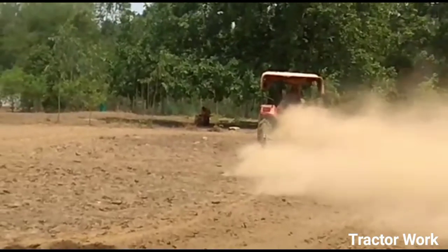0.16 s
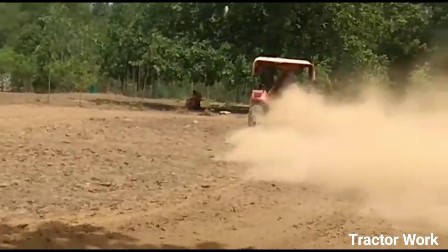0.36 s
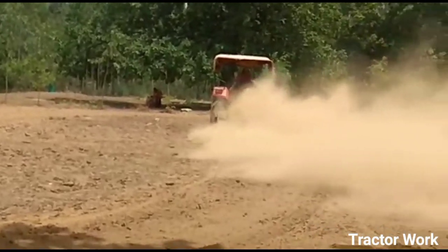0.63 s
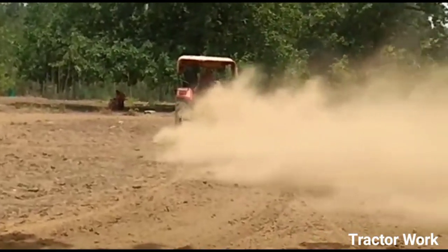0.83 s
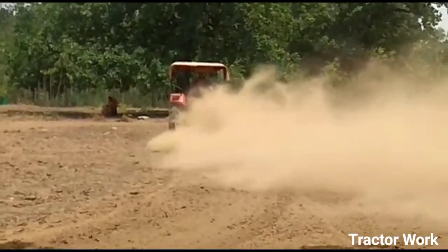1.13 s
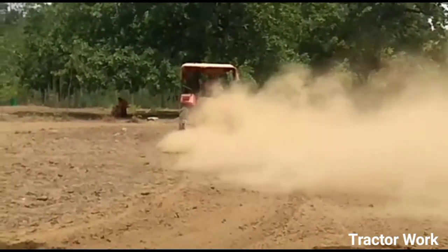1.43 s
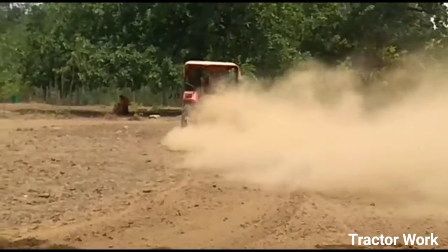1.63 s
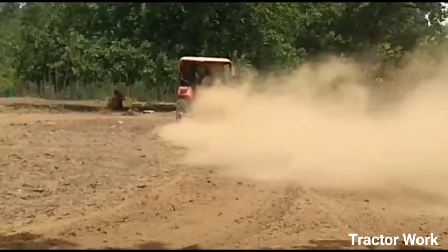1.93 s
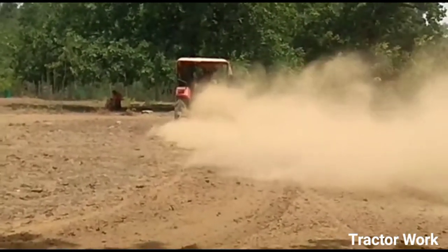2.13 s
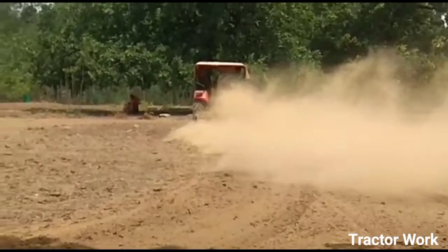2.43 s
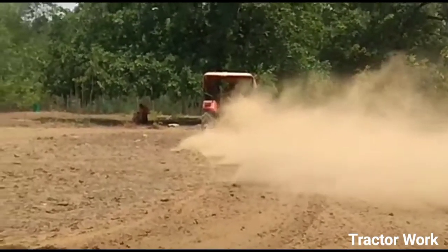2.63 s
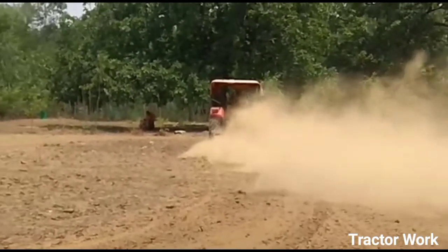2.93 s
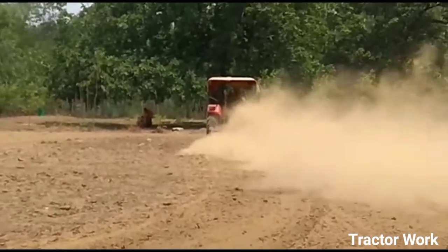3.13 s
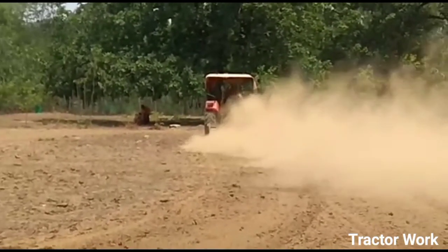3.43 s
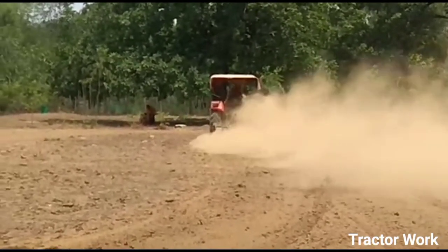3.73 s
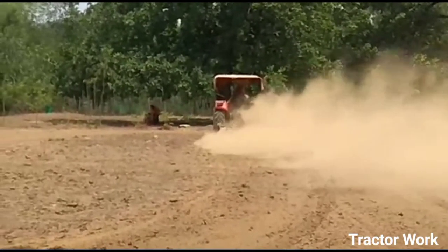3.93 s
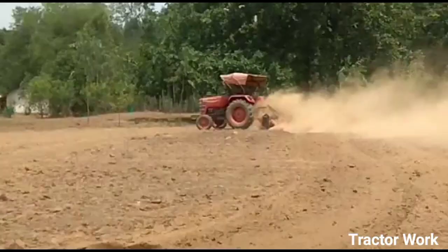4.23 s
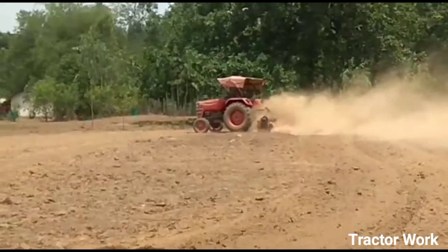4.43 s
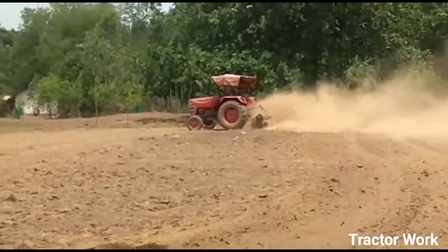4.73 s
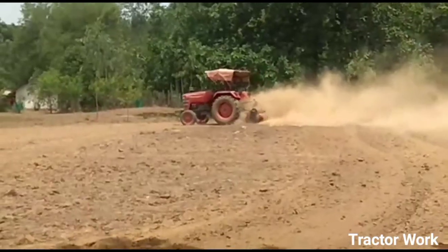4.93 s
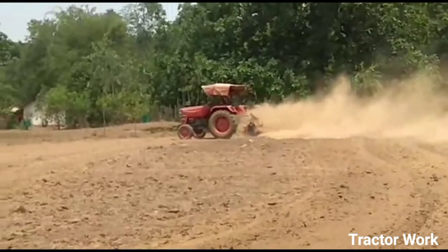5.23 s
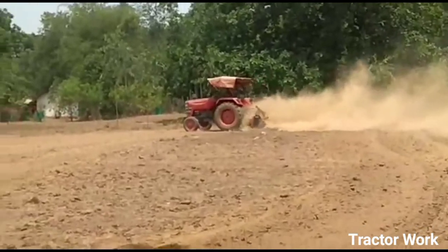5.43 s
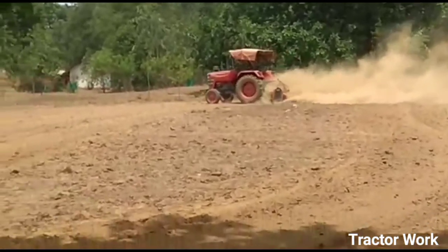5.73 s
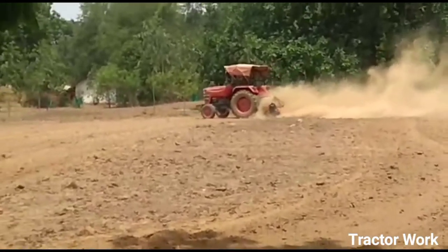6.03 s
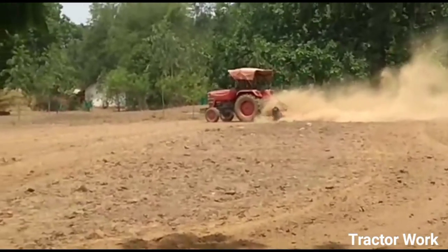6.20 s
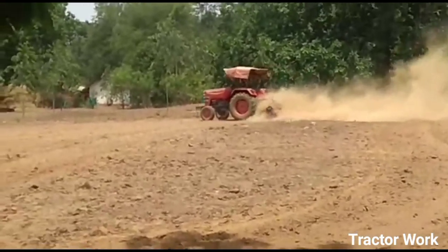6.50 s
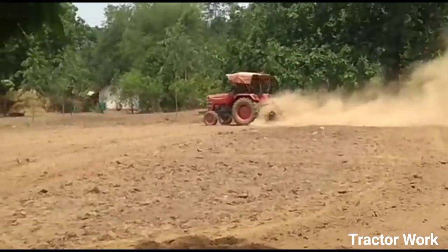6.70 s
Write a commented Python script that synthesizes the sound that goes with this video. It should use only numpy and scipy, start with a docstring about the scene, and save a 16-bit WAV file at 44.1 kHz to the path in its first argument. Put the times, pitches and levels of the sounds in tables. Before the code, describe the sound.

A diesel tractor throbs and rasps while its tiller churns dry soil, with hissing grit and stones clanking on steel, then sounds farther off.

```python
"""A three-cylinder diesel tractor drags a rotary tiller through dry soil, heard from behind, then
farther off from the side. Each firing pulses the exhaust, which throbs and rasps, and shakes the
panels and engine block. Soil drag sets the clatter; the tines scrape, crunch clods and throw up
hissing showers and crumbs. Stones ring the steel hood, pebbles clink, and a few dull thumps and
knocks fall in between, over faint open-field air."""
import sys
import numpy as np
from scipy import signal
from scipy.fft import rfft, irfft, next_fast_len
from scipy.io import wavfile

SR = 44100
rng = np.random.default_rng(int(sys.argv[2]) if len(sys.argv) > 2 else 0)


def write(x):
    x = np.atleast_2d(x).T
    wavfile.write(sys.argv[1], SR, np.round(np.clip(x, -1, 1) * 32767).astype(np.int16))


N = 302526
TIME_S = np.arange(N) / SR
FFT_SIZE = next_fast_len(N + 8192)
FREQ_HZ = np.maximum(np.arange(FFT_SIZE // 2 + 1) * SR / FFT_SIZE, 1)
TURN_S = 4.15
SIDE_VIEW = np.clip((TIME_S - TURN_S) / 0.043 + .5, 0, 1)   # 0 from behind, 1 from the side


def from_db(db):
    """Decibels to gain."""
    return np.exp(np.asarray(db) * (np.log(10) / 20))


def unit(x):
    """Stereo pair scaled to centre rms 1."""
    return x / np.sqrt(np.mean(x.mean(axis=0) ** 2) + 1e-20)


def curve(rows):
    """(t/s, value) rows at every sample."""
    return np.interp(TIME_S, *np.transpose(rows))


def pan(db):
    """L-R level to two gains of mean 1."""
    gains = from_db(np.array([[.5], [-.5]]) * db)
    return gains / gains.mean(axis=0)


def drift(rate_hz):
    """Random wander, spread about 1."""
    knots = rng.standard_normal(2048)
    return np.interp(TIME_S * rate_hz, np.arange(len(knots)), knots)


def stereo_noise(coherence):
    """White noise, partly common to both sides."""
    common = np.sqrt(coherence) * rng.standard_normal(N)
    return common + np.sqrt(1 - coherence) * rng.standard_normal((2, N))


def colour(x, spectrum):
    """Filter by (f/Hz, level/dB) rows; white noise keeps its power."""
    hz, db = np.transpose(spectrum)
    gain = from_db(np.interp(np.log(FREQ_HZ), np.log(hz), db))
    return irfft(rfft(x, FFT_SIZE) * gain / np.sqrt(np.mean(gain ** 2)), FFT_SIZE)[:, :N]


def bandpass(x, low_hz, high_hz, order=3):
    """Flat-topped band filter."""
    return signal.sosfilt(signal.butter(order, [low_hz, high_hz], "band", fs=SR, output="sos"), x)


def radiate(x, modes, view, flicker_db):
    """Steep, separately flickering resonances, rms 1; view 0..1 blends their two level columns."""
    spectrum = rfft(x.astype(np.float32), FFT_SIZE)
    out = power = 0
    for hz, width_hz, rear_db, side_db, pan_db in modes:
        skirt = 1 + ((FREQ_HZ / hz - hz / FREQ_HZ) * hz / width_hz) ** 2 / 2
        band = irfft(spectrum / (skirt ** 1.5).astype(np.float32), FFT_SIZE)[:, :N]
        gain = from_db(rear_db) * (1 - view) + from_db(side_db) * view
        out = out + band * gain * from_db(flicker_db * drift(28)) * pan(pan_db)
        power = power + width_hz * gain ** 2
    return unit(out / np.sqrt(power))


def puffs(firing, depth, decay, delay):
    """Envelope with one burst a firing; decay and delay in firing periods."""
    return np.sqrt(1 + depth * np.exp(-((firing - delay) % 1) / decay))


def dying(clicks, t60_s):
    """Exponential tail on each click."""
    return signal.lfilter([1], [1, -from_db(-60 / (t60_s * SR))], clicks + 1e-18)


def grains(per_s, spread_db, t60_s, clump_db):
    """Envelope of many small, uneven impacts in clumps."""
    sizes = from_db(spread_db * np.minimum(rng.exponential(1, N), 3))
    born = rng.random(N) < per_s / SR
    power = dying(born * sizes ** 2, t60_s / 2)
    return np.sqrt(.35 + power) * from_db(clump_db * drift(35))


def burst(at_s, t60_s):
    """Envelope of one blow."""
    start, out = int(at_s * SR), np.zeros(N)
    age_s = TIME_S[:min(N - start, int(2 * t60_s * SR))]
    out[start:start + len(age_s)] = from_db(-60 * age_s / t60_s)
    return out


def strike(at_s, modes, rise_s):
    """One blow rings (f/Hz, level/dB, t60/s) modes."""
    start, out = int(at_s * SR), np.zeros(N)
    age_s = TIME_S[:min(N - start, SR // 4)]
    ring = sum(from_db(db - 60 * age_s / t60_s) * np.sin(2 * np.pi * hz * age_s)
               for hz, db, t60_s in modes)
    out[start:start + len(age_s)] = ring * (1 - np.exp(-age_s / rise_s))
    return out


# engine speed: t/s, firing rate/Hz
FIRING_RATE = [(0.0, 43.85), (0.9, 43.65), (1.5, 43.85), (2.0, 44.15), (2.5, 44.2), (2.8, 44.5),
               (3.1, 44.3), (3.6, 44.6), (4.17, 43.95), (4.6, 44.15), (6.0, 44.15), (6.86, 43.9)]
def firing_phase():
    """Running count of cylinder firings."""
    return np.cumsum(curve(FIRING_RATE)) / SR - .5


# exhaust harmonics: order of the four-stroke cycle, full level/dB, dull level/dB
NOTE_ORDERS = [(5, -27, -7), (6, -10.5, -4.5), (8, -14.5, -17), (9, 3.5, 7), (10, -18, -52),
               (11, -13.5, 2.5), (12, -12.5, 3.5), (13, -10.5, -25), (15, -2.5, -15), (18, -11.5, -35),
               (21, -33, -29), (27, -36, -23.5)]
# exhaust note: t/s, level/dB
NOTE_LEVEL = [(0.0, -36.5), (0.85, -38), (1.05, -37.5), (1.5, -40.5), (1.76, -36), (2.4, -42.5),
              (2.64, -36), (2.9, -43), (3.18, -37), (3.35, -42.5), (3.97, -44), (4.06, -41.5), (4.13, -39),
              (4.18, -57.5), (4.42, -45.5), (4.74, -53.5), (5.2, -48.5), (6.08, -46.5), (6.32, -48.5),
              (6.59, -46.5), (6.86, -46)]
def exhaust_note(firing, dull):
    """Every third order is a firing harmonic; unequal cylinders fill in the rest."""
    out = 0
    for order, full_db, dull_db in NOTE_ORDERS:
        gain = from_db(full_db + (dull_db - full_db) * dull + 1.3 * drift(20))
        # ground and tree reflections shift the phase between the sides
        shift_rad = 1.25 * drift(4) * np.array([[.5], [-.5]])
        out = out + gain * np.sin(2 * np.pi * (order / 3 * firing % 1) + shift_rad)
    return out * from_db(curve(NOTE_LEVEL) + 1.74) * pan(-2.8 - 3 * SIDE_VIEW)


# low exhaust resonances: f/Hz, width/Hz, full level/dB, dull level/dB, L-R/dB
RUMBLE_MODES = [(32.3, 9.2, -5.5, -1, -4), (105, 47, 0.5, -4, -21), (168, 37.6, 10, 12.5, -4.5),
                (256, 57, 2, -50, -1), (407, 130, -31.5, -21, -8), (480, 380, -39, -62, -4)]
# rumble: t/s, level/dB
RUMBLE_LEVEL = [(0.0, -47), (0.04, -32), (0.53, -37.5), (0.65, -35.5), (1.58, -36.5), (1.66, -33),
                (2.14, -41.5), (2.16, -33.5), (2.5, -45.5), (2.54, -32.5), (2.85, -44.5), (3.13, -43),
                (3.17, -30.5), (3.36, -43.5), (4.1, -46), (4.6, -45), (5.84, -50.5), (6.86, -44.5)]
def exhaust_rumble(firing, dull):
    """Uneven firings drive the low resonances."""
    drive = stereo_noise(0.92) * puffs(firing, depth=8.3, decay=0.9, delay=-0.044)
    gain = from_db(curve(RUMBLE_LEVEL) - 3 + 1.4 * SIDE_VIEW)
    return gain * radiate(drive, RUMBLE_MODES, dull, flicker_db=1.6) * pan(.2 - 2 * SIDE_VIEW)


# mid exhaust resonances: f/Hz, width/Hz, rear level/dB, side level/dB, L-R/dB
RASP_MODES = [(741, 100, -8.5, 3, -7), (791.6, 57, 4.5, -16, -7.5), (842.5, 53, 0.5, 7, -7),
              (873, 71, -13.5, 14, -25), (982, 96, -6.5, 0, -11)]
# rasp: t/s, level/dB
RASP_LEVEL = [(0.0, -40.5), (0.07, -42), (2.65, -49.5), (2.77, -55.5), (2.85, -50.5), (3.0, -56),
              (3.13, -42), (3.5, -59.5), (3.61, -51), (3.78, -58), (3.82, -48), (3.92, -57.5),
              (4.03, -50.5), (4.26, -56.5), (4.34, -45), (4.43, -55), (4.99, -63), (5.01, -50.5),
              (5.16, -70), (6.31, -66), (6.48, -77), (6.86, -72)]
def exhaust_rasp(firing):
    """Each firing sends a pressure step and a puff of gas out of the pipe."""
    gas = stereo_noise(.85) * puffs(firing, depth=11, decay=.22, delay=-.14)
    pulses = from_db(27) * (np.diff(firing % 1, prepend=0) < 0)
    return from_db(curve(RASP_LEVEL)) * radiate(gas + pulses, RASP_MODES, SIDE_VIEW, flicker_db=1.8)


# exhaust timbre: t/s, dullness (0 full, 1 dull)
DULLNESS = [(0, -0.19), (1.2, -0.12), (2.3, -0.0023), (3.2, 0.3), (3.7, 0.45), (4.12, 0.45), (4.18, 0.72),
            (6.86, 0.71)]
def exhaust(firing):
    """Note, rumble and rasp; upper orders fade as the tractor swings round."""
    dull = curve(DULLNESS)
    return exhaust_note(firing, dull) + exhaust_rumble(firing, dull) + exhaust_rasp(firing)


# soil drag, as the clatter it causes: t/s, level/dB
DRAG_LEVEL = [(0.0, -46), (0.5, -46.5), (0.67, -49.5), (2.23, -51.5), (3.15, -46.5), (3.36, -56.5),
              (3.67, -54), (3.82, -64), (4.07, -59), (4.24, -46), (4.49, -54.5), (4.68, -51), (4.83, -44.5),
              (4.97, -43.5), (5.14, -52.5), (5.37, -53), (5.54, -45), (5.69, -49), (6.22, -45.5),
              (6.44, -51), (6.6, -48), (6.86, -48)]
def drag_gain(db, share, side_db, loss_db_per_s, reference_db=-51):
    """Gain of a part: follows the drag, then steps and ramps from the turn on."""
    swing_db = share * (curve(DRAG_LEVEL) - reference_db)
    away_s = np.maximum(TIME_S - TURN_S, 0)
    return from_db(db + swing_db + side_db * SIDE_VIEW - loss_db_per_s * away_s)


# panel resonances: f/Hz, width/Hz, rear level/dB, side level/dB, L-R/dB
PANEL_MODES = [(1253, 69, 3.5, -54, -3), (1362, 71, 0.5, -1, -24), (1504, 72, 7.5, 5.5, -2),
               (1631, 108, 0, 7.5, -41), (2104, 143, -1.5, -9, 0.5), (2300, 118, -18.5, 9, -24)]
def panel_rattle(shake, scrape):
    """Firings and scrapes rattle the panels."""
    impacts = stereo_noise(0.36) * shake * grains(55, 2.4, 0.016, 2.2)
    drag = drag_gain(db=-59, share=1.23, side_db=4, loss_db_per_s=4.5)
    gain = np.hypot(drag, from_db(-5.5) * scrape)
    return gain * radiate(impacts, PANEL_MODES, SIDE_VIEW, flicker_db=4)


# tiller resonances: f/Hz, width/Hz, rear level/dB, side level/dB, L-R/dB
TILLER_MODES = [(2580, 91, -8, -18, 1), (2770, 70, -4, 21, -8), (2988, 130, 5, 15, -6),
                (3096, 127, 0.5, 13, 7), (3214, 81, 1.5, 16.5, -22), (4815, 96, -7.5, 16.5, 2),
                (5590, 72, -26.5, 6, -8), (6160, 190, -11.5, 7, -11)]
def tiller_clatter(scrape):
    """Drag and scrapes ring the tiller's steel."""
    impacts = stereo_noise(0.15) * grains(90, 0.69, 0.024, 1.0)
    drag = drag_gain(db=-62, share=1.25, side_db=3.5, loss_db_per_s=5)
    return np.hypot(drag, scrape) * radiate(impacts, TILLER_MODES, SIDE_VIEW, flicker_db=7.5)


# engine block resonances: f/Hz, width/Hz, rear level/dB, side level/dB, L-R/dB
BLOCK_MODES = [(3766, 75, 3, 0.5, -33), (3888, 170, 2.5, 5, -8), (4018, 64, 2.5, 2, -6),
               (4030, 85, -32, 9.5, 4), (4226, 300, -5.5, 7, 6), (5560, 140, -44, 0.5, -17),
               (7600, 246, -13.5, 5.5, -36)]
def block_ticks(shake, scrape):
    """The block ticks, shaken by firings and scrapes."""
    impacts = stereo_noise(0.49) * shake * grains(120, 0.23, 0.028, 0.9)
    drag = drag_gain(db=-53, share=0.56, side_db=-2.5, loss_db_per_s=-0.5)
    gain = np.hypot(drag, from_db(1.5) * scrape)
    return gain * radiate(impacts, BLOCK_MODES, SIDE_VIEW, flicker_db=3)


# hiss bands: f/Hz, width/Hz, rear level/dB, side level/dB, L-R/dB
SPRAY_BANDS = [(7000, 210, -3.5, -1, 8), (7640, 620, 9, 12, -12), (8700, 100, 10, 11, -7),
               (9390, 300, 10.5, 6.5, 18), (10150, 320, 6.5, 3, 12), (11270, 750, 6, 2.5, 25),
               (12300, 1000, 6.5, -3, 3.5), (13400, 600, 10.5, -3.5, -3.5), (14460, 300, -5, -14, -11)]
# flying soil: t/s, level/dB
SPRAY_LEVEL = [(0.0, -47), (0.48, -48.5), (1.32, -52), (1.83, -48.5), (2.35, -55), (2.58, -51.5),
               (2.83, -48.5), (2.93, -59), (3.08, -50.5), (3.3, -46), (3.41, -66), (3.48, -54), (3.95, -57),
               (4.28, -49), (4.6, -56), (4.66, -55.5), (4.93, -53.5), (5.22, -56.5), (5.71, -51.5),
               (5.94, -59), (6.61, -63.5), (6.86, -70)]
def soil_spray(shake):
    """Soil thrown up by the tines hisses, pulsing with the firings."""
    impacts = stereo_noise(0.15) * shake * grains(220, 2.0, 0.011, 1.4)
    return from_db(curve(SPRAY_LEVEL) - 5.5) * radiate(impacts, SPRAY_BANDS, SIDE_VIEW, flicker_db=3.6)


# crumb ticks: f/Hz, level/dB
CRUMB_SPECTRUM = [(1500, -10), (3000, -5), (4300, -4), (5300, -16), (7000, -7.5), (9000, -5.5),
                  (14000, -9.5)]
def crumbs(count, spread_db, t60_s, scatter_db):
    """Single crumbs patter on the machine, louder while much soil flies."""
    out, age_s = np.zeros((2, N + SR)), TIME_S[:SR // 25]
    pitches_hz, colour_db = np.transpose(CRUMB_SPECTRUM)
    base_db = curve(SPRAY_LEVEL) + 1
    decay = from_db(-60 * age_s / t60_s)
    for when, pitch, size, side in rng.random((count, 4)):
        start = int(when * N)
        hz = pitches_hz[0] + pitch * (pitches_hz[-1] - pitches_hz[0])
        size_db = spread_db * min(-np.log(1 - size), np.pi)
        db = base_db[start] + np.interp(hz, pitches_hz, colour_db) + size_db
        tick = from_db(db) * decay * np.sin(2 * np.pi * hz * age_s)
        out[:, start:start + len(age_s)] += tick * pan(scatter_db * (2 * side - 1))
    return out[:, :N]


# loose soil: t/s, length/s, level/dB, low f/Hz, high f/Hz, L-R/dB
SHOWERS = [(0.0, 0.29, -54, 6550, 9400, -3), (0.439, 0.28, -48.5, 6930, 14200, 0),
           (0.552, 0.042, -45.5, 6830, 15000, -2), (0.99, 0.21, -57, 7600, 14900, 6),
           (1.777, 0.094, -58, 9700, 15100, 1), (2.53, 0.15, -62, 8500, 14000, -1),
           (3.177, 0.16, -55, 7250, 14400, -3), (3.526, 0.069, -51.5, 6500, 12000, 6),
           (3.698, 0.14, -56, 7500, 14600, 1), (4.001, 0.047, -53.5, 7200, 12900, 0),
           (4.105, 0.37, -56, 8400, 10700, 4), (4.71, 0.24, -54.5, 7100, 9900, 0),
           (5.09, 0.088, -65, 11900, 13500, -3), (5.52, 0.59, -60, 9400, 11800, 11),
           (6.057, 0.11, -65, 6360, 7760, -13)]
def soil_showers():
    """Each shower of fine grains swells and sinks in its own band."""
    out = np.zeros((2, N))
    sand = stereo_noise(0.043) * grains(1600, 1.1, 0.0024, 0.37)
    for at_s, length_s, db, low_hz, high_hz, pan_db in SHOWERS:
        span = slice(int(at_s * SR), int((at_s + length_s) * SR))
        band = unit(bandpass(sand[:, span], low_hz, high_hz))
        swell = np.sin(np.linspace(0, np.pi, band.shape[1]))
        out[:, span] += from_db(db) * pan(pan_db) * band * swell
    return out


# open field: f/Hz, density/dB
AIR_SPECTRUM = [(20, -8), (60, 6), (200, 3.5), (500, -11), (1200, -9.5), (2500, -14), (5000, -21),
                (9000, -35), (15000, -39)]
def field_air():
    """Faint, steady outdoor noise."""
    return from_db(-59) * colour(stereo_noise(0.37), AIR_SPECTRUM)


# dry clods: t/s, level/dB, t60/s, low f/Hz, high f/Hz, L-R/dB
CLOD_BURSTS = [(0.247, -37, 0.078, 2600, 4200, -6), (1.285, -46, 0.05, 7640, 14500, 2),
               (1.491, -50, 0.07, 7560, 13000, 0), (1.556, -58, 0.067, 7000, 14000, 2),
               (1.963, -48, 0.19, 5000, 12900, 1), (2.972, -45, 0.06, 2700, 4300, 0),
               (3.438, -47.5, 0.27, 7000, 15000, 1), (3.738, -49, 0.14, 8000, 15000, 5),
               (4.017, -48, 0.071, 6500, 11900, -10), (4.179, -38, 0.028, 1510, 4240, -8),
               (4.639, -51, 0.1, 3500, 9350, -7), (4.952, -42, 0.035, 2500, 8000, -11),
               (5.062, -53, 0.063, 2800, 6000, 0), (6.699, -56, 0.04, 3000, 15000, -4)]
def clod_bursts(rise_s):
    """A clod bursts on the tines; its grit dies away in its own band."""
    out = np.zeros((2, N))
    grit = stereo_noise(0.12) * grains(640, 1.0, 0.002, 0)
    for at_s, db, t60_s, low_hz, high_hz, pan_db in CLOD_BURSTS:
        start = int(at_s * SR)
        age_s = TIME_S[:min(N - start, SR // 4)]
        span = slice(start, start + len(age_s))
        envelope = from_db(db - 60 * age_s / t60_s) * (1 - np.exp(-age_s / rise_s))
        out[:, span] += envelope * pan(pan_db) * unit(bandpass(grit[:, span], low_hz, high_hz))
    return out


# steel tiller hood: f/Hz, level/dB, t60/s
HOOD_MODES = [(1400, -16, 0.079), (2120, -18, 0.17), (2170, -27, 0.13), (2578, -8, 0.22), (2930, -6, 0.056),
              (3200, 2, 0.082), (3430, -13, 0.066), (3743, -11.5, 0.19), (3817, -2, 0.069),
              (4020, -7.5, 0.027), (4090, -13.5, 0.06), (4560, -36, 0.029), (5900, -66, 0.074),
              (5660, -30, 0.19), (7350, -21, 0.035)]
# stones and clods on the hood: t/s, high ring level/dB, crack and low ring level/dB
HOOD_HITS = [(0.249, -30, -58), (0.442, -36, -63), (0.8764, -33, -63), (1.4907, -25, -49), (1.63, -33, -65),
             (1.8766, -36, -62), (1.96, -23.5, -40), (2.0434, -34, -55), (2.14, -33, -67),
             (2.3745, -35, -72), (2.724, -27, -44), (2.9703, -32.5, -59), (3.0348, -28, -47),
             (3.094, -25, -39), (3.24, -32, -47), (3.279, -32, -36.5), (3.4395, -30, -61),
             (3.511, -27, -36), (3.5419, -13.5, -23.5), (3.5471, -24, -26.5), (4.008, -28.5, -45),
             (4.0184, -22, -36.5), (4.238, -25, -59), (4.386, -30, -53), (5.13, -31, -47)]
# crack of a hit: f/Hz, density/dB
CRACK_SPECTRUM = [(600, -13), (900, 9), (1200, -25), (1600, 2.5), (2400, 9), (3200, -4), (4200, 16.5),
                  (4900, 10.5), (5400, 4.5), (7500, -9), (11000, -25), (15000, -20)]
def stones_on_hood(split_hz, scatter_db, detune, breakup_s):
    """Each hit rings another spot of the hood; hard ones crack and reach the low modes."""
    hz, mode_db, t60_s = np.transpose(HOOD_MODES)
    ring = 0
    for at_s, high_db, low_db in HOOD_HITS:
        pitch_draw, level_draw = rng.standard_normal((2, len(hz)))
        db = np.where(hz > split_hz, high_db, low_db) + mode_db + scatter_db * level_draw
        ring = ring + strike(at_s, zip(hz * (1 + detune * pitch_draw), db, t60_s), rise_s=0.0012)
    times_s, _, crack_db = np.transpose(HOOD_HITS)
    blows = np.bincount((times_s * SR).astype(int), from_db(crack_db), N)
    decay = dying(blows, t60_s=0.04) + from_db(-18) * dying(blows, t60_s=0.35)
    pole = np.exp(-1 / (breakup_s * SR))   # a clod takes a moment to break up
    crack = signal.lfilter([1 - pole], [1, -pole], decay)
    grit = colour(unit(stereo_noise(0.19) * grains(1300, 0.8, 0.00091, 0)), CRACK_SPECTRUM)
    return from_db(-5) * (ring * pan(-12.5) + crack * grit * pan(-3.6))


# pebbles: t/s, level/dB, f/Hz, t60/s, L-R/dB
PEBBLES = [(0.349, -41, 8500, 0.14, -7), (0.6904, -50, 2950, 0.033, -3), (4.2997, -26.5, 4020, .04, -16),
           (4.6414, -40.5, 4280, 0.044, -9), (4.729, -42, 1555, 0.08, -24), (4.7645, -24, 4010, 0.038, -14),
           (5.132, -45, 4800, 0.096, -14), (5.768, -48, 2800, 0.045, -5)]
def pebble_clinks(pair_ratio, pair_db, rise_s):
    """A pebble flicked off the tines rings with two close, beating modes."""
    out = 0
    for at_s, db, hz, t60_s, pan_db in PEBBLES:
        modes = [(hz, db, t60_s), (hz * pair_ratio, db + pair_db, t60_s)]
        out = out + strike(at_s, modes, rise_s) * pan(pan_db)
    return out


# hard patches: t/s, length/s, steel level/dB, crunch level/dB
HARD_PATCHES = [(0.474, 0.11, -62, -41.5), (0.54, 0.15, -64, -46.5), (1.026, 0.24, -51.5, -55.5),
                (1.352, 0.071, -57.5, -62), (1.932, 0.14, -52, -60), (2.527, 0.21, -53, -79),
                (3.04, 0.33, -49.5, -69), (3.246, 0.13, -79, -79), (3.432, 0.079, -55, -69),
                (3.591, 0.127, -54, -62), (3.662, 0.26, -54, -59.5), (4.007, 0.11, -51.5, -51),
                (4.281, 0.21, -47.5, -55.5), (4.628, 0.27, -50.5, -56.5), (4.816, 0.09, -50.5, -56),
                (3.03, 0.031, -52, -47.5), (3.096, 0.02, -69, -60), (3.268, 0.038, -69, -68),
                (5.055, 0.039, -48, -64), (5.118, 0.055, -58, -57), (5.338, 0.18, -55.5, -66),
                (5.434, 0.1, -65, -69), (5.748, 0.17, -55, -68), (5.755, 0.032, -60, -61),
                (6.07, 0.099, -58.5, -71)]
def tine_scrapes(rise_share):
    """Steel and crunch envelopes as the tines scrape through hard soil."""
    out = np.zeros((2, N))
    for at_s, length_s, steel_db, crunch_db in HARD_PATCHES:
        span = slice(int(at_s * SR), int((at_s + length_s) * SR))
        swell = np.sqrt(np.interp((TIME_S[span] - at_s) / length_s, [0, rise_share, 1], [0, 1, 0]))
        out[:, span] += from_db([[steel_db], [crunch_db]]) * swell
    return out


# crushed clods: f/Hz, density/dB
CRUNCH_SPECTRUM = [(800, -4), (1700, -3.5), (2100, -3.5), (2900, 10), (3400, 6), (4300, 10), (5300, -24),
                   (8000, -1), (15000, -40)]
def clod_crunch(envelope):
    """The tines crush clods in clumps of tiny impacts."""
    impacts = unit(stereo_noise(0.35) * grains(240, 1.0, 0.0066, 4.5))
    return envelope * colour(impacts, CRUNCH_SPECTRUM)


# low thumps: t/s, level/dB, L-R/dB
THUMP_HITS = [(0.834, -29, 25), (1.593, -26.5, 28), (1.644, -26.5, 33), (1.682, -31, 30), (1.718, -27, 10),
              (1.767, -32, -15), (1.918, -28.5, 21), (2.189, -38, 30), (2.217, -30, 30), (2.548, -47, 6),
              (2.855, -39, -3), (3.498, -33.5, 19)]
# body of a thump: f/Hz, density/dB
THUMP_SPECTRUM = [(60, -17), (115, 16), (190, 14), (300, 7), (420, -8.5), (650, -13), (900, -42),
                  (1400, -50)]
def thumps(t60_s):
    """Dull noise bursts close by, each from its own side."""
    blows = sum(from_db(db) * burst(at_s, t60_s) * pan(pan_db) for at_s, db, pan_db in THUMP_HITS)
    return colour(blows * stereo_noise(0.99), THUMP_SPECTRUM)


# dull knocks: t/s, level/dB, f/Hz
KNOCK_HITS = [(0.843, -48, 547), (1.17, -45, 1210), (1.205, -45.5, 1310), (1.364, -42, 1140),
              (1.415, -46, 1070), (1.705, -43.5, 1210), (1.944, -42, 1000), (2.04, -42, 1300),
              (2.275, -37.5, 612), (2.305, -50, 1180), (2.63, -43, 1280), (3.061, -47.5, 1230),
              (3.13, -42, 1570), (3.317, -47, 1300), (3.61, -36.5, 840), (4.159, -43, 1520),
              (4.319, -41, 1385), (6.264, -37, 1015), (6.291, -53, 1040), (6.328, -50, 1020)]
def knocks(t60_s, half_width_oct):
    """Hollow knocks: noise bursts, each ringing around its own pitch."""
    out, white = 0, stereo_noise(1.0)
    edge_ratio = 2 ** half_width_oct
    for at_s, db, hz in KNOCK_HITS:
        blow = burst(at_s - .002, t60_s) * white + 1e-18
        ring = bandpass(blow, hz / edge_ratio, hz * edge_ratio, order=2)
        out = out + from_db(db + 2) * ring / np.abs(ring).max()
    return out * pan(-10)


def scene():
    """Impacts, soil, tractor and air, summed in stereo."""
    hits = (stones_on_hood(split_hz=3500, scatter_db=2, detune=0.004, breakup_s=0.0021)
            + pebble_clinks(pair_ratio=1.035, pair_db=-9, rise_s=0.002)
            + clod_bursts(rise_s=0.0024)
            + knocks(t60_s=0.14, half_width_oct=0.094)
            + thumps(t60_s=0.21))
    loose_soil = soil_showers() + crumbs(count=2000, spread_db=3.2, t60_s=0.005, scatter_db=16)
    firing = firing_phase()
    shake = puffs(firing, depth=4.3, decay=0.86, delay=-0.09)
    scrape, crunch = tine_scrapes(rise_share=0.13)
    tractor = (exhaust(firing) + panel_rattle(shake, scrape)
               + tiller_clatter(scrape) + block_ticks(shake, scrape))
    return tractor + soil_spray(shake) + clod_crunch(crunch) + loose_soil + hits + field_air()


def record(dry):
    """Steep low-pass at 15.3 kHz."""
    return signal.sosfilt(signal.ellip(10, .1, 80, 15300, fs=SR, output="sos"), dry)


dry = scene()
out = record(dry)
write(out)
```